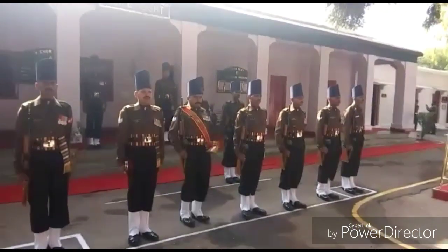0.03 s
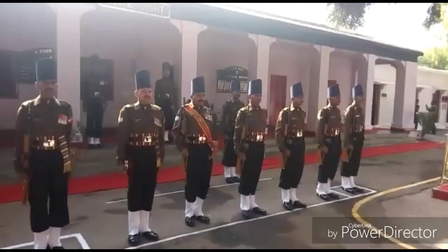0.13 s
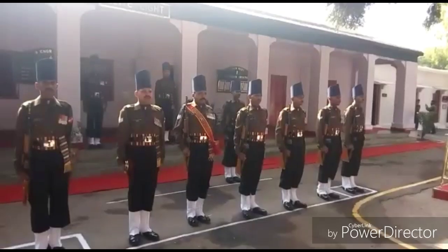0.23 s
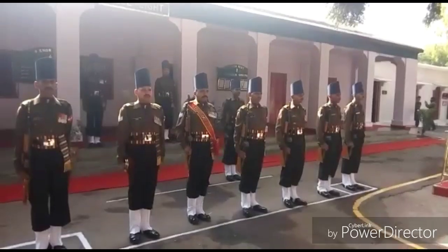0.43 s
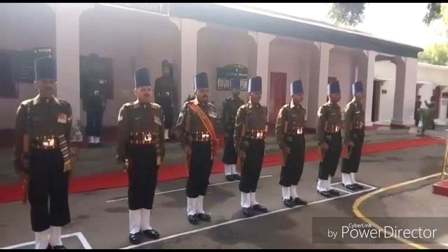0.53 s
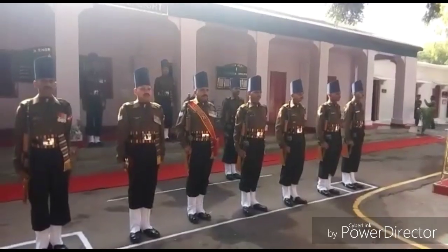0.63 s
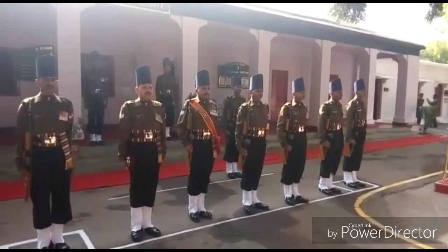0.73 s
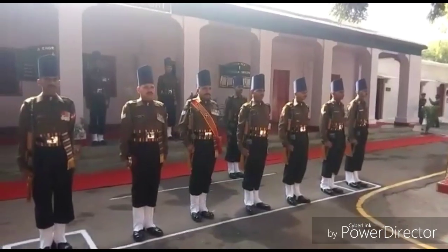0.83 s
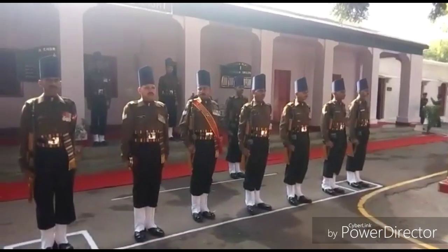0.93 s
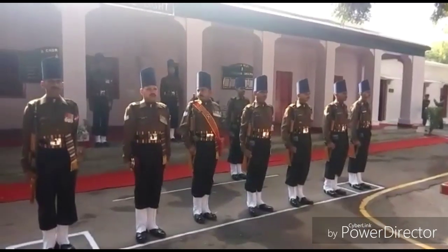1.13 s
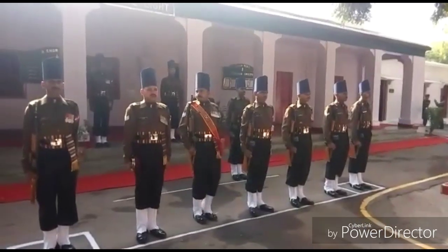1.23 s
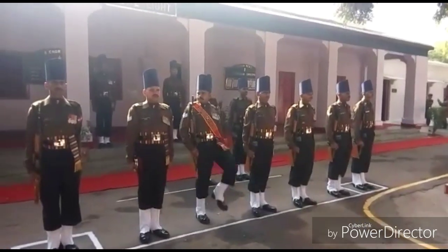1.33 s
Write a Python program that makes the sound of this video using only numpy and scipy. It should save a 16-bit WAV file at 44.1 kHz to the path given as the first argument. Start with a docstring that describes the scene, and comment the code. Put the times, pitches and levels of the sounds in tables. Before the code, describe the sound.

A soldier stamps one boot on a paved parade yard, a sharp crack with a brief echo off the walls. A small bird then chirps twice, faintly, over a quiet rumble of distant traffic.

```python
"""A paved parade yard, where a soldier stamps one boot. Heel and sole strike within two milliseconds, with a
weak last contact at five, and so brief an impact excites a broad spectrum: a crack. Reflections from the
colonnade and walls return as a swelling wash and a few slaps. His trouser leg swishes as it swings, and his kit
ticks. Afterwards a small bird chirps twice in gliding harmonics, over a quiet rumble of distant traffic."""
import sys
import numpy as np
from scipy import signal
from scipy.fft import rfft, irfft, next_fast_len
from scipy.io import wavfile
from scipy.ndimage import map_coordinates

SR = 44100
rng = np.random.default_rng(int(sys.argv[2]) if len(sys.argv) > 2 else 0)


def persist_wave(psi):
    """Save psi, clipped to +-1, as 16-bit WAV."""
    counts = np.round(np.clip(psi, -1, 1) * 32767).astype(np.int16)
    wavfile.write(sys.argv[1], SR, np.atleast_2d(counts).T)


N = 61739

# Parts of the boot landing. Each row: delay in seconds, click and ring gain in dB, grit gain in dB,
# treble edge in Hz.
BOOT_CONTACTS = [(0, 1, 0.5, 5830), (.0012, 1, 2, 17000), (.0019, -4.5, -3.5, 14000),
                 (.0051, -14, -9, 6900)]
# Modes of boot and paving. Each row: frequency in Hz, relative level in dB, t60 in seconds.
BOOT_MODES = [(460, -20.5, 0.025), (802, -30.5, 0.043), (1267, -22.5, 0.041), (1770, -27, 0.02),
              (2233, -23, 0.031), (4547, -11.5, 0.015), (6200, -25, 0.0066)]
# Spectrum of the impact. Each row: frequency in Hz, relative level in dB.
CRACK_SPECTRUM = [(100, -21), (250, -1), (500, 1.5), (950, -7.5), (1400, -6), (2200, 2.5), (3000, -6),
                  (5000, 0.5), (6500, 0), (10000, -4.5), (15000, 0)]
# Spectrum of the yard's reverberation. Each row: frequency in Hz, relative level in dB.
WASH_SPECTRUM = [(60, -12), (150, 6.5), (300, 5), (480, 4), (750, 3.5), (1400, 0.5), (2300, -4.5),
                 (3300, 0), (4300, -1), (6000, -5), (9000, -8.5), (15000, -16)]
# Reverberation time of the yard. Each row: frequency in Hz, t60 in seconds.
WASH_DECAY = [(150, 0.79), (700, 0.7), (2000, 0.84), (5000, 0.61), (9000, 0.48), (15000, 0.27)]
# Single wall echoes. Each row: delay in seconds, level in dB, t60 in seconds, treble edge in Hz.
WALL_SLAPS = [(0.016, -23, 0.02, 9000), (0.041, -23, 0.032, 1000), (0.0657, -18.5, 0.011, 6000),
              (0.201, -27, 0.046, 3670)]
# Spectrum of a wall echo. Each row: frequency in Hz, relative level in dB.
SLAP_SPECTRUM = [(80, -13), (250, 3), (480, 2.5), (800, 4), (1200, -4.5), (2400, -1.5), (3800, 3.5),
                 (5000, -3.5), (7000, -3), (15000, -2)]
# Ticks of cloth, buckles and boots. Each row: start in seconds, level in dB, t60 in seconds,
# centre in Hz, relative weight of the broadband body in dB.
KIT_TICKS = [(0.0104, -29.5, 0.022, 4120, -15), (0.1026, -28.5, 0.016, 6640, -13),
             (0.2003, -32, 0.031, 4800, -9), (.582, -42.5, .03, 4950, -3), (1.27, -34, 0.019, 4880, 0)]
# Envelope of the leg's swish. Each row: time in seconds, level in dB.
SWISH_ENVELOPE = [(0.189, -80), (.203, -38), (.213, -58), (0.226, -39.5), (0.241, -47), (.25, -58)]
# Spectrum of the swish. Each row: frequency in Hz, relative level in dB.
SWISH_SPECTRUM = [(150, -6), (420, 7), (600, -9), (870, 4), (1300, -13), (4000, -18), (15000, -22)]
# Bird calls, one list a chirp. Each row: time in seconds, second partial's frequency in Hz,
# then levels in dB of the second, first and third partials.
CHIRP_CONTOURS = [
    [(.774, 3000, -50, -70, -56), (.78, 4100, -43, -61.5, -57.5), (.786, 4800, -45, -50, -68),
     (.797, 4650, -45.5, -51.5, -68), (.81, 4460, -30.5, -56, -71), (.822, 4337, -36, -58, -68),
     (.831, 4080, -42, -67, -60), (.848, 3750, -39, -63, -50), (.868, 3040, -55, -67, -51)],
    [(1.035, 3000, -49, -73, -64), (1.042, 3736, -50, -58, -57), (1.047, 4818, -45, -47.5, -71),
     (1.055, 4744, -47.5, -47.5, -63), (1.064, 4130, -45, -66, -64), (1.084, 4076, -44.5, -71, -58),
     (1.092, 3785, -50.5, -68, -53), (1.113, 3630, -43, -63, -51), (1.128, 3410, -56, -70, -52)],
]
# Timbre of the chirps. Each row: rasp depth in dB, echo level in dB relative to the call.
CHIRP_RASP_ECHO = [(-28, -12), (-11, -5.5)]
# Spectrum of distant traffic. Each row: frequency in Hz, relative level in dB.
TRAFFIC_SPECTRUM = [(20, -30), (40, -15.5), (62, -4), (100, -0.5), (160, 0.5), (220, -7), (320, -22.5),
                    (700, -41.5)]
# Spectrum of the open air's hiss. Each row: frequency in Hz, relative level in dB.
AIR_SPECTRUM = [(60, -15), (250, 2), (450, -0.5), (1200, -1), (1850, -1), (2500, -5), (4000, -4),
                (6000, -13), (9000, -13), (15000, -19)]
# Microphone response, a hollow top octave with a port resonance. Each row: frequency in Hz, gain in dB.
MIC_RESPONSE = [(20, -1), (6300, 0), (7100, -8.5), (8000, -18), (9000, -22), (10500, -20), (12000, -22),
                (13800, -22), (14500, -11), (15000, 0.5), (15500, -12), (16000, -14)]

STAMP_S = 0.2421


def stamp():
    """Impact: each contact clicks, excites damped modes and crushes grit; the heel's weight thuds."""
    rise_s, cutoff_hz = 0.00015, 184

    def mode(start, hz, t60):
        return burst(start, t60, rise_s) * np.sin(2 * np.pi * hz * since(start))

    out = amp(-12.5) * mode(STAMP_S, hz=310, t60=0.015)  # thud
    for delay, db, grit_db, edge_hz in BOOT_CONTACTS:
        start = STAMP_S + delay
        colour = rolled_off(CRACK_SPECTRUM, edge_hz)
        delayed = lambda hz: causal(colour(hz)) * np.exp(-2j * np.pi * hz * start)
        click = filtered(signal.unit_impulse(N), delayed)
        ring = sum(amp(level) * mode(start, hz, t60) for hz, level, t60 in BOOT_MODES)
        out += amp(db) * (amp(4.5) * click + ring)
        out += amp(grit_db - 9) * burst(start, t60=0.0078, rise=rise_s) * noise(colour)
    # The boot is too small to radiate well below the cutoff.
    return filtered(out, lambda hz: causal(hz ** 3 / np.sqrt(hz ** 6 + cutoff_hz ** 6)))


def yard_wash():
    """Reverberation: scattered reflections build up, then are absorbed, the treble first."""
    peak_s, swell_db, onset_s = 0.077, 7.5, 0.0062
    t, late = since(STAMP_S), since(STAMP_S + peak_s)
    hz, frame_s, spectra = signal.stft(coloured(WASH_SPECTRUM), SR, nperseg=256)
    age = np.maximum(frame_s - STAMP_S - peak_s, 0)
    decay = np.exp(-np.log(1000) * age / along(WASH_DECAY, hz)[:, None])
    wash = signal.istft(spectra * decay, SR, nperseg=256)[1][:N]
    below_peak_db = swell_db * np.maximum(1 - t / peak_s, 0)
    drop_db = 4.5 * (1 - np.exp(-late / 0.01))  # quick fall once the nearest walls have answered
    clumping_db = 2 * wobble(700)  # reflections arrive in clumps
    return wash * amp(-26.5 - below_peak_db - drop_db + clumping_db) * (1 - np.exp(-t / onset_s))


def wall_slaps():
    """Specular reflection: each flat wall returns one short burst after its travel time."""
    out = np.zeros(N)
    for delay, db, t60, edge_hz in WALL_SLAPS:
        slap = noise(rolled_off(SLAP_SPECTRUM, edge_hz))
        out += amp(db) * burst(STAMP_S + delay, t60, rise=0.0011) * slap
    return out


def kit():
    """Friction and light impacts: the trouser leg swishes down; cloth, buckles and boots tick."""
    width_octaves, body_hz = 0.72, 1500
    swish_db = np.interp(since(0), *np.transpose(SWISH_ENVELOPE))
    out = amp(swish_db) * coloured(SWISH_SPECTRUM)
    for start, db, t60, centre_hz, body_db in KIT_TICKS:
        bright = lambda hz: np.exp(-0.5 * (np.log2((hz + 1) / centre_hz) / width_octaves) ** 2)
        body = lambda hz: 2 * amp(body_db) / (1 + hz / body_hz)
        out += amp(db) * burst(start, t60, rise=0.0006) * noise(lambda hz: bright(hz) + body(hz))
    return out


def bird():
    """Frequency modulation: four harmonics flick up and slide down, and the yard reverberates."""
    jitter, flutter_db, rasp_rate_hz = 0.006, 1.6, 900
    t, out = since(0), np.zeros(N)
    for contour, (rasp_db, echo_db) in zip(CHIRP_CONTOURS, CHIRP_RASP_ECHO):
        times, second_hz, second_db, first_db, third_db = np.transpose(contour)
        fundamental_hz = np.interp(t, times, second_hz / 2) * (1 + jitter * wobble(400))
        phase = 2 * np.pi * np.cumsum(fundamental_hz) / SR
        gate = np.clip(np.minimum(t - times[0], times[-1] - t) / 0.0015 + 1, 0, 1)
        call = np.zeros(N)
        for k, db in enumerate([first_db, second_db, third_db, third_db - 13], 1):
            level_db = np.interp(t, times, db) + flutter_db * wobble(150)
            # Random modulation of amplitude and phase roughens the tone.
            rasp = 1 + amp(rasp_db) * (wobble(rasp_rate_hz) + 1j * wobble(rasp_rate_hz))
            call += np.sqrt(2) * gate * amp(level_db) * np.imag(rasp * np.exp(1j * k * phase))
        tail = rng.standard_normal(N) * burst(0, t60=0.73, rise=0.035)
        echo = signal.fftconvolve(call, tail / np.linalg.norm(tail))[:N]
        out += call + amp(echo_db) * echo
    return out


def background():
    """Ambient noise: distant traffic rumbles and the open air hisses, each wavering slightly."""
    traffic = amp(-45.5 + 0.49 * wobble(11.67)) * coloured(TRAFFIC_SPECTRUM)
    air = amp(-47 + 0.4 * wobble(8.1)) * coloured(AIR_SPECTRUM)
    return traffic + air


def amp(db):
    """Amplitude ratio of a level in decibels."""
    return 10 ** (np.asarray(db) / 20)


def along(points, hz):
    """Interpolation of (Hz, value) points on a logarithmic frequency axis."""
    freqs, values = np.transpose(points)
    return np.interp(np.log(hz + 1), np.log(freqs + 1), values)


def rolled_off(points, edge_hz):
    """Low-pass response: a (Hz, dB) spectrum losing a further 12 dB an octave above the edge."""
    return lambda hz: amp(along(points, hz)) / np.sqrt(1 + (hz / edge_hz) ** 4)


def since(start):
    """Seconds elapsed since a moment, zero before it."""
    return np.maximum(np.arange(N) / SR - start, 0)


def burst(start, t60, rise):
    """Exponential decay of 60 dB in t60 seconds, after a quick rise."""
    t = since(start)
    return (1 - np.exp(-t / rise)) * np.exp(-np.log(1000) * t / t60)


def wobble(rate):
    """Random modulation: a smooth curve with rate knots a second."""
    return map_coordinates(rng.standard_normal(N // 10), [np.arange(N) * rate / SR])


def filtered(x, response):
    """Linear filtering: the spectrum of x times a function of frequency."""
    size = next_fast_len(N + SR // 2)
    return irfft(rfft(x, size) * response(np.fft.rfftfreq(size, 1 / SR)), size)[:N]


def noise(response):
    """Gaussian noise, filtered and scaled to rms 1."""
    shaped = filtered(rng.standard_normal(N), response)
    return shaped / np.sqrt(np.mean(shaped ** 2) + 1e-20)


def coloured(points):
    """Noise of rms 1 with a (Hz, dB) spectral shape."""
    return noise(lambda hz: amp(along(points, hz)))


def causal(gain):
    """Minimum-phase response with the given gain, by folding the cepstrum."""
    cepstrum = irfft(np.log(np.maximum(gain, 1e-6)))
    half = len(cepstrum) // 2
    cepstrum[1:half] *= 2
    cepstrum[half + 1:] = 0
    return np.exp(rfft(cepstrum))


def scene():
    """Superposition: direct sounds, reflections and background add at the microphone."""
    return (stamp() + yard_wash() + wall_slaps() + kit() + bird() + background())[None]


def record(dry):
    """Frequency response: the small microphone colours the sound and limits its bandwidth."""
    top_hz = 15900
    response = lambda hz: causal(amp(along(MIC_RESPONSE, hz))) / (1 + (hz / top_hz) ** 160)
    return filtered(dry[0], response)[None]


dry = scene()
out = record(dry)
persist_wave(out)
```